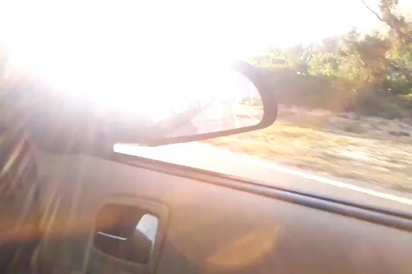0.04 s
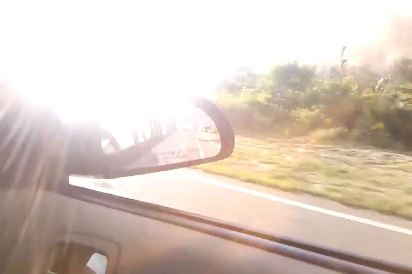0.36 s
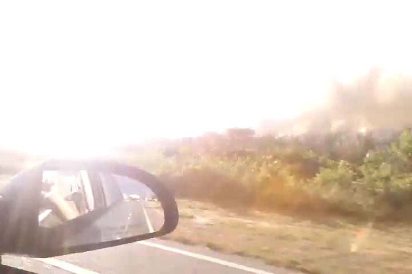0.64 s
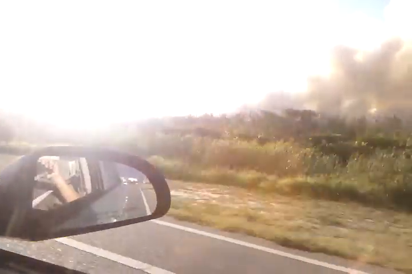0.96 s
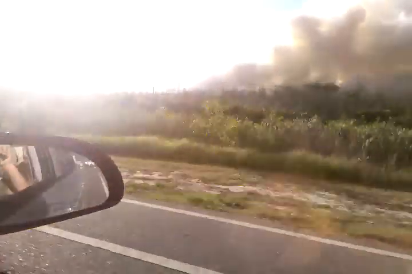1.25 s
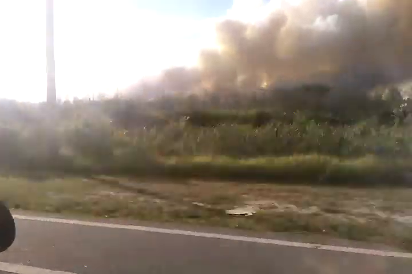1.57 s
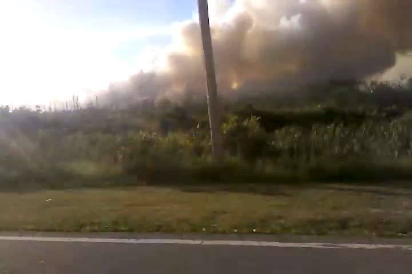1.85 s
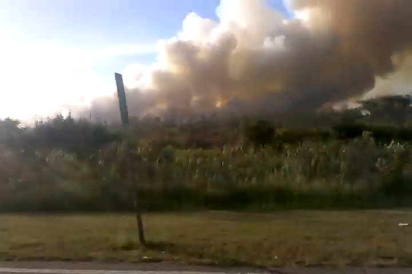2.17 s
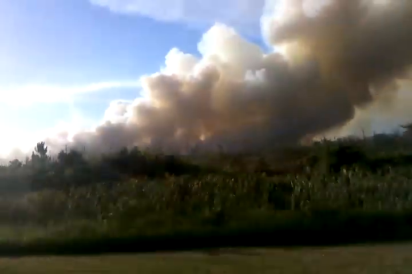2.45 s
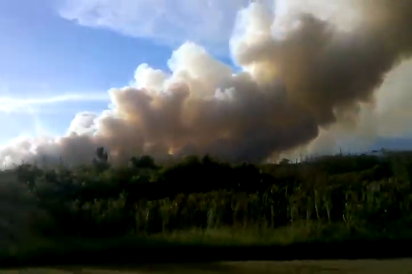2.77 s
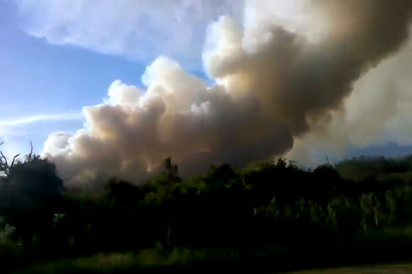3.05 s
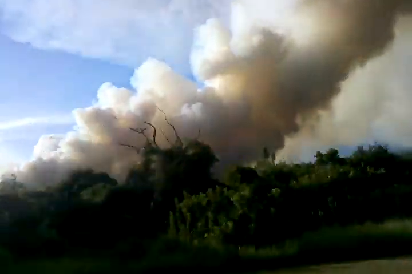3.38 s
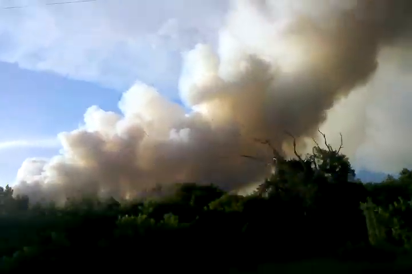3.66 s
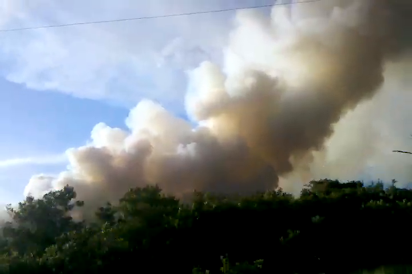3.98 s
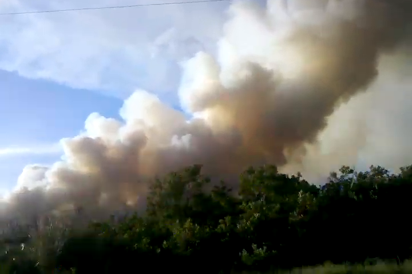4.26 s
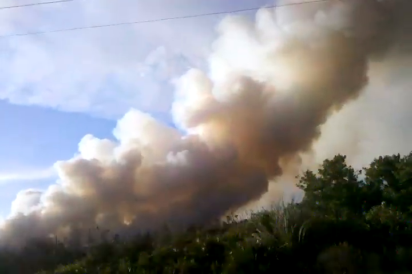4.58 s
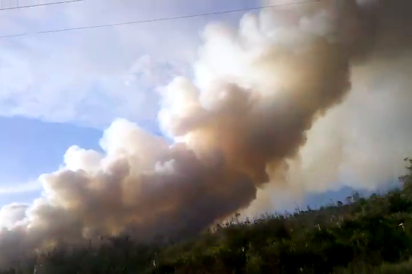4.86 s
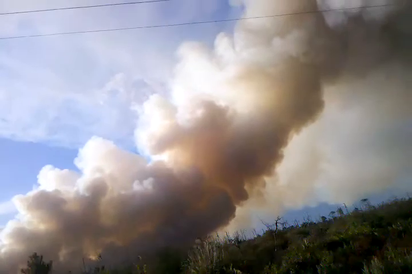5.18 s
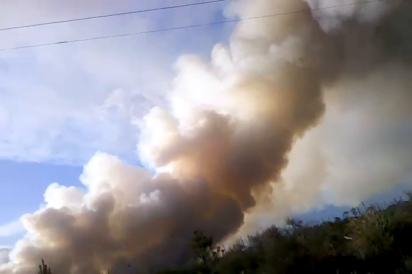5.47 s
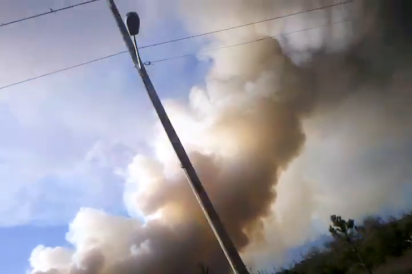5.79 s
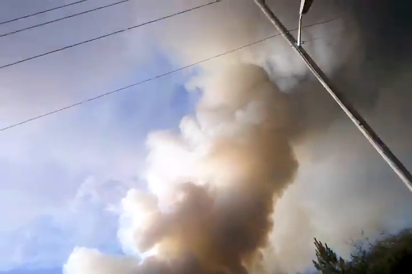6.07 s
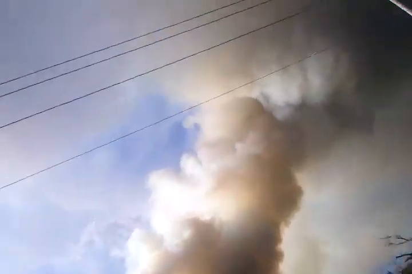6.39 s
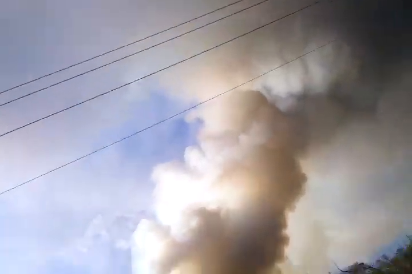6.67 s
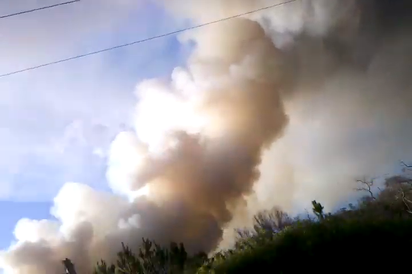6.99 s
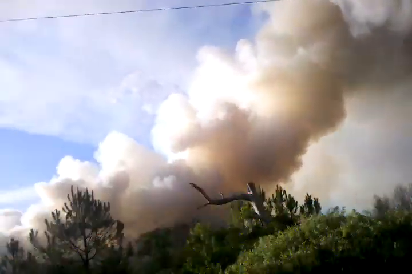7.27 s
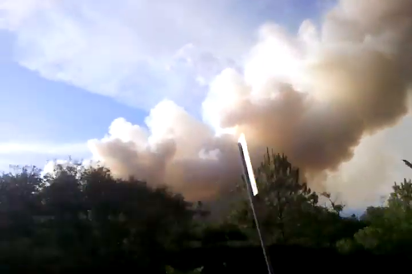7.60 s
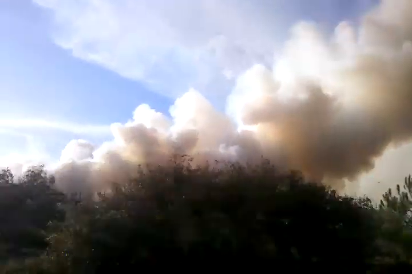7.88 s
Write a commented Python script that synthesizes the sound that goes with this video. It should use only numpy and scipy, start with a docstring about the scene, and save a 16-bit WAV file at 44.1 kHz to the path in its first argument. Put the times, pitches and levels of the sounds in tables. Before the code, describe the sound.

A car cruises along with a steady road rumble, then gusts of wind thump and crackle on the microphone.

```python
"""Wind at an open car window

A small camera microphone is held at the side window of a moving car, fading in on engine and tyres.
Then it meets the slipstream: turbulence sweeps right over the capsule, louder and brighter the
faster the air. The hardest eddies overload the capsule and the recorder, and crackle."""
import sys
import numpy as np
from scipy import signal
from scipy.fft import rfft, irfft
from scipy.io import wavfile
from scipy.ndimage import uniform_filter1d, map_coordinates

SR = 44100
rng = np.random.default_rng(int(sys.argv[2]) if len(sys.argv) > 2 else 0)


def master_out(mix):
    """Clip the mix to full scale and print it as 16-bit PCM to the path in sys.argv[1]."""
    frames = np.transpose(np.atleast_2d(mix))
    ceiling = np.clip(frames, -1, 1)
    pcm = np.round(ceiling * 32767).astype(np.int16)
    wavfile.write(sys.argv[1], SR, pcm)


N = 354123
SLIPSTREAM_S = 1.8  # the microphone enters the airflow

# Big eddies that slap the microphone.
# Each row: start in seconds, length in seconds, relative level in dB, relative air speed.
EDDIES = [(1.858, 0.0089, -12, 1.25), (1.884, .03, -11.5, .8), (1.934, .025, -15, .7),
          (2.062, 0.0049, -7.5, 1.7), (2.091, .018, -8, .55), (2.178, .024, -5, .9), (2.214, .047, -9, 1.4),
          (2.411, .018, -12, .8), (2.474, .006, -7, 1.9), (2.492, .015, -12, 1.1), (2.697, .011, -8, .7),
          (2.769, .011, -6.5, 1.8), (2.959, 0.036, -5.5, 1.5), (3.03, .022, -6, 1.5),
          (3.089, .012, -8, 1.8), (3.115, .023, -7.5, 1.85), (3.178, .014, -9.5, 1.65),
          (3.228, 0.0093, -9, 1.5), (3.336, 0.0069, 2, 1.8), (3.363, .02, 1.5, 1.3), (3.388, .015, 4, 2.8),
          (3.413, .045, -3, 1.15), (3.54, .021, -6, .8), (3.635, .015, -7.5, .95), (3.825, .04, -10, .75),
          (3.939, 0.0099, -6, 1.75), (3.972, 0.029, -6, 2.3), (4.148, .013, -5, 1.05),
          (4.19, .028, -7, 2.4), (4.249, .014, -9, .8), (4.31, .014, -8, .65), (4.342, .014, -7, .7),
          (4.402, .015, -8, 1), (4.439, 0.036, -4.5, 2.2), (4.541, .014, -7, .7), (4.655, .02, -9, 1),
          (4.701, .04, -2, 2.1), (4.939, 0.0088, -8, 2.1), (4.987, .016, -9, .9), (5.038, .013, -7, .7),
          (5.142, .02, -7, .9), (5.273, .012, -10, 2.2), (5.312, 0.026, -13.5, 1), (5.375, 0.024, -11, .9),
          (5.49, 0.025, -8.5, 1.85), (5.559, 0.047, -7, 2.1), (5.883, 0.0059, -12, 1.7),
          (5.905, 0.0087, -7.5, 2.5), (5.932, .028, -9.5, 1.4), (5.985, 0.041, -8, 1.7),
          (6.069, .058, -3.5, 1.4), (6.149, .03, -11.5, 1.2), (6.319, .011, -13.5, 1.6),
          (6.352, .016, 2.5, 2.4), (6.373, 0.046, -7.5, 1.5), (6.435, .035, -7.5, 2.05),
          (6.6, 0.027, -5, .7), (6.722, .015, 3, 1.2), (6.737, .021, 1.5, 2.1), (6.774, 0.032, -2.5, 1.85),
          (6.861, .036, -6, 2.1), (6.938, .075, -6, 1.8), (7.022, 0.038, -4, 1.9), (7.1, .043, -4, 2.05),
          (7.169, .014, -5, 2.5), (7.218, .027, -8.5, .7), (7.322, .034, -5.5, 1.7), (7.384, .014, -2, 2.2),
          (7.478, .029, -2.5, 1.95), (7.525, .022, -10, 1.3), (7.725, .014, -8.5, 1.1),
          (7.787, .011, -6.5, 1.1), (7.827, 0.0069, -12, 1.9), (7.85, 0.081, -12.5, .9)]


def undb(db):
    """Decibels to gain."""
    return 10 ** (np.asarray(db) / 20)


def curve(rows):
    """Rows of (seconds, value) joined by straight lines, one value a sample."""
    return np.interp(np.arange(N) / SR, *np.transpose(rows))


def noise(spectrum):
    """Noise of rms 1, its spectrum shaped by (Hz, dB) points."""
    hz, db = np.transpose(spectrum)
    bins = np.maximum(np.fft.rfftfreq(N, 1 / SR), 1)
    gain = undb(np.interp(np.log(bins), np.log(hz), db))
    x = irfft(rfft(rng.standard_normal(N)) * gain, N)
    return x / x.std()


def wander(rate_hz):
    """Random values, each held 1 / rate_hz seconds, smoothed twice and scaled to a spread of 1."""
    hold = max(int(SR / rate_hz), 1)
    steps = rng.standard_normal(N)[np.arange(N) // hold]
    x = uniform_filter1d(uniform_filter1d(steps, hold), hold)
    return x / x.std()


def car(waver_db):
    """Engine and tyres heard from the window at cruising speed, wavering with the road surface."""
    # Cabin boom near 200 Hz, tread roar near 1.1 kHz, air hiss above.
    # Each row: frequency in Hz, relative spectral level in dB.
    road_spectrum = [(30, -10), (90, -5), (175, 4.5), (215, 2.5), (330, -5), (600, -9), (900, -10.5),
                     (1120, -4), (1400, -10.5), (1800, -12), (2400, -18.5), (3700, -21), (5000, -23.5),
                     (7000, -32.5)]
    # Loudness of the drive in the cabin. Each row: time in seconds, level in dB.
    drive_levels = [(.8, -26.5), (1.7, -26.8), (2.5, -24), (4, -26), (6, -26.5), (8.03, -26)]
    return noise(road_spectrum) * undb(curve(drive_levels) + waver_db * wander(rate_hz=14))


def gust(trim_db=-0.3043, lull_db=-6):
    """Level of the slipstream in dB: it swells and ebbs, and drops away in the lulls."""
    # Strength of the stream between eddies. Each row: time in seconds, relative level in dB.
    stream_levels = [(1.8, -30), (1.88, -30), (2.08, -20), (2.96, -22), (3.14, -14), (3.41, -15),
                     (3.66, -22), (4.37, -17), (4.99, -23), (5.89, -19), (6.0, -17), (6.73, -18),
                     (6.97, -12), (7.32, -13), (7.54, -20), (7.73, -20), (7.87, -26), (8.03, -25.5)]
    # The stream lets go of the microphone. Each row: middle in seconds, half length in seconds.
    lulls = [(2.845, .05), (4.105, .02), (4.865, .04), (5.21, .015), (6.245, .04), (7.662, .03),
             (7.988, 0.038)]
    t = np.arange(N) / SR
    lull = sum(np.exp(-((t - middle) / half) ** 4) for middle, half in lulls)
    return curve(stream_levels) + trim_db + lull_db * lull


def wakes(relative_db=-10.5, build_s=.012, fade_s=.028):
    """Strength of the stirred air: it builds just before each big eddy and dies more slowly behind it."""
    t = np.arange(N) / SR
    stir = np.zeros(N)
    for start, length, level_db, _ in EDDIES:
        near = slice(*np.searchsorted(t, [start - .1, start + .4]))
        age = t[near] - start
        shape = np.exp(np.minimum(age, 0) / build_s - np.maximum(age - length, 0) / fade_s)
        stir[near] = np.maximum(stir[near], undb(level_db + relative_db) * shape)
    return stir


def small_eddies(stream_db, per_second=14, length_s=.011, lift_db=5, scatter_db=2):
    """Small eddies ride at random a little above the gust; returns rows like those of EDDIES."""
    gap_draw, level_draw, speed_draw = rng.random((200, 3)).T
    starts = SLIPSTREAM_S + np.cumsum(.3 + 1.4 * gap_draw) / per_second
    gust_db = np.interp(starts * SR, np.arange(N), stream_db)
    levels_db = gust_db + lift_db + scatter_db * (2 * level_draw - 1)
    speeds = .9 * 2 ** (speed_draw - .5)
    return [(start, length_s, db, speed)
            for start, db, speed in zip(starts, levels_db, speeds) if start < N / SR]


def airflow(flutter_db, eddy_boost_db, speed_exponent, eddy_speed_scale):
    """Strength and relative speed of the air at the microphone: a fluttering gust, eddies and wakes."""
    usual_db = -16  # buffeting level at which the stream has speed 1
    rise_s, fall_s = .002, .002
    front_s, front_db, front_speedup = .005, 1.8, .1  # an eddy's front is stronger and faster
    t = np.arange(N) / SR
    stream_db = gust()
    db = 20 * np.log10(np.hypot(undb(stream_db), wakes())) + flutter_db * wander(rate_hz=110)
    speed = undb(speed_exponent * (db - usual_db))
    ragged_db = 2.46 * wander(rate_hz=150)
    for start, length, level_db, body_speed in small_eddies(stream_db) + list(EDDIES):
        # an eddy takes over the flow with a steep front, turns ragged, and lets go
        near = slice(*np.searchsorted(t, [start - .02, start + .2]))
        age = t[near] - start
        share = np.clip(age / rise_s + .5, 0, 1) * np.exp(-np.maximum(age - length, 0) / fall_s)
        front = np.exp(-np.maximum(age, 0) / front_s)
        eddy_db = level_db + eddy_boost_db + front_db * front + ragged_db[near] * (1 - front)
        eddy_speed = body_speed * eddy_speed_scale * (1 + front_speedup * front)
        db[near] += share * (eddy_db - db[near])
        speed[near] += share * (eddy_speed - speed[near])
    return undb(db) * (t > SLIPSTREAM_S), speed


def wind(shear_speed_db, shear_level_db, swing_db, swing_exponent):
    """A frozen pattern of turbulence passes the microphone port: faster air shifts its spectrum up."""
    # Turbulent pressure at air speed 1. Each row: frequency in Hz, relative spectral level in dB.
    turbulence_spectrum = [(20, -6.5), (80, 0.5), (160, 2), (300, -4.5), (600, -8.5), (1000, -17),
                           (1700, -26.5), (3000, -42), (6000, -67), (12000, -77)]
    # Slow pressure swing of a whole eddy. Each row: frequency in Hz, relative spectral level in dB.
    swing_spectrum = [(20, -6), (60, -2), (110, 0.5), (170, 1.5), (280, -12), (600, -47.5)]
    strength, speed = airflow(flutter_db=2.5, eddy_boost_db=1.2, speed_exponent=.25,
                              eddy_speed_scale=.91)
    # thin shear layers inside the flow pass as brief rushes, brighter and louder at once
    shear = wander(rate_hz=400) * np.minimum(speed, 1.5)
    travel = np.cumsum(speed * undb(shear_speed_db * shear))
    pattern = noise(turbulence_spectrum)
    turbulence = map_coordinates(pattern, [travel % (N - 1)], order=3, mode="mirror")
    # fast eddies also shove the diaphragm slowly to and fro
    swing = undb(swing_db) * speed ** swing_exponent * noise(swing_spectrum)
    return strength * (undb(shear_level_db * shear) * turbulence + swing)


def capsule(pressure, limit, low_cut_hz=115, high_cut_hz=6970):
    """The microphone saturates; its bass cut makes each flat top sag, and only the voice band passes."""
    x = limit * np.tanh(pressure / limit)
    x = signal.sosfilt(signal.butter(2, low_cut_hz, "high", fs=SR, output="sos"), x)
    return signal.sosfilt(signal.cheby1(10, .5, high_cut_hz, fs=SR, output="sos"), x)


def scene():
    """Wind right on the microphone and the car behind it, in mono."""
    buffeting = wind(shear_speed_db=2.0, shear_level_db=1.0, swing_db=-8.5, swing_exponent=1.21)
    return (buffeting + car(waver_db=0.9))[None]


def record(dry):
    """The overloaded microphone feeds a recorder that clips, fades in, dulls and cuts the top."""
    # The opening fade from silence. Each row: time in seconds, linear gain.
    fade_in = [(0.806, 0), (0.81, .13), (0.87, .28), (0.95, .66), (1.05, 1)]
    full_scale, knee_sharpness = .71, 40
    dull_hz, top_hz = 9500, 15900
    x = capsule(dry, limit=.85)
    clipped = x / (1 + np.abs(x / full_scale) ** knee_sharpness) ** (1 / knee_sharpness)
    dulled = signal.sosfilt(signal.butter(1, dull_hz, fs=SR, output="sos"), clipped * curve(fade_in))
    return signal.sosfilt(signal.ellip(8, .1, 70, top_hz, fs=SR, output="sos"), dulled)


dry = scene()
out = record(dry)
master_out(out)
```